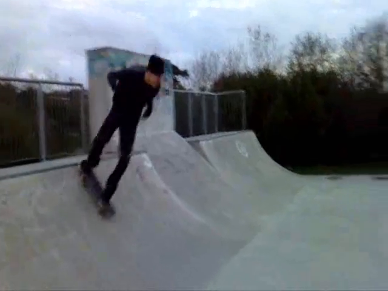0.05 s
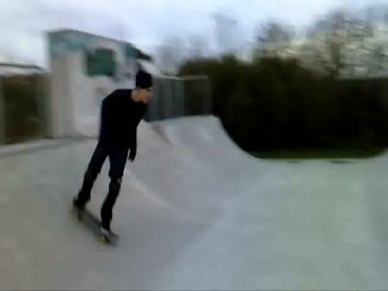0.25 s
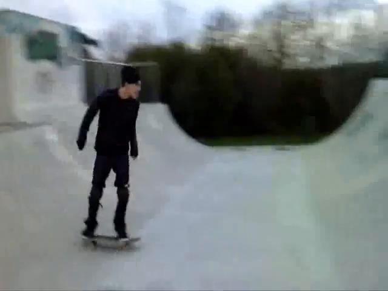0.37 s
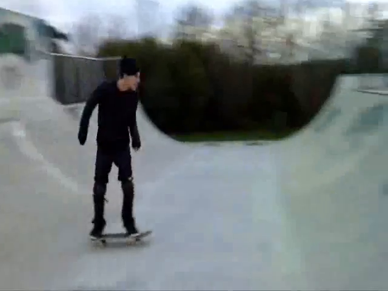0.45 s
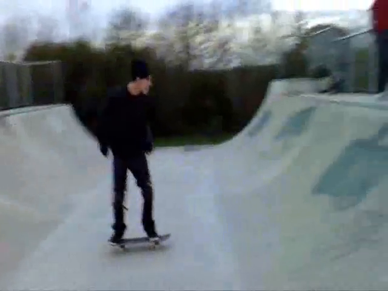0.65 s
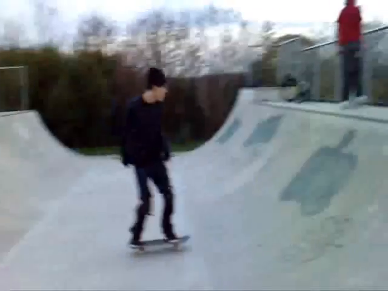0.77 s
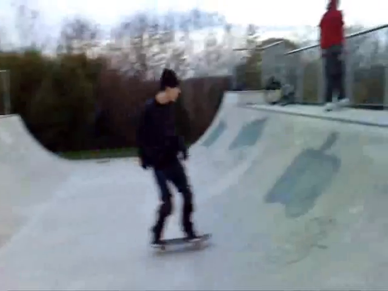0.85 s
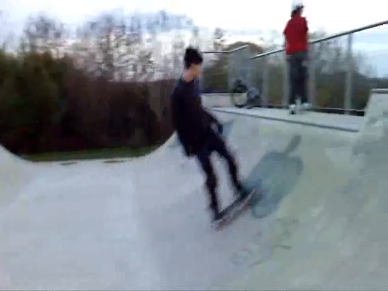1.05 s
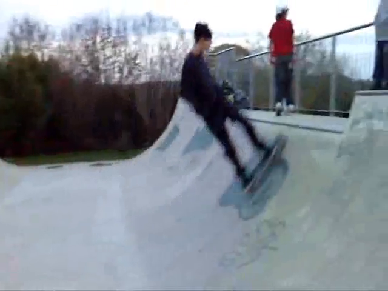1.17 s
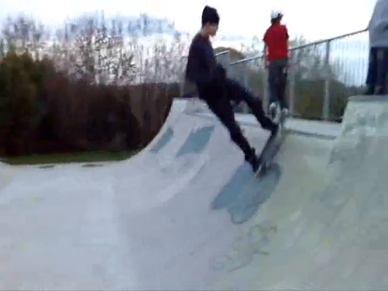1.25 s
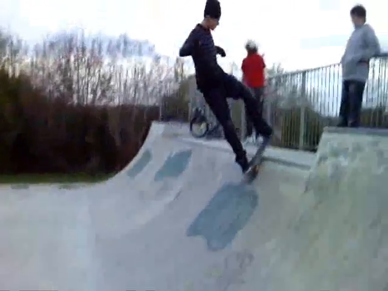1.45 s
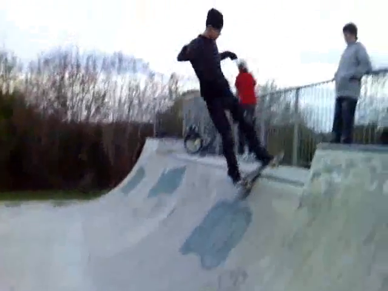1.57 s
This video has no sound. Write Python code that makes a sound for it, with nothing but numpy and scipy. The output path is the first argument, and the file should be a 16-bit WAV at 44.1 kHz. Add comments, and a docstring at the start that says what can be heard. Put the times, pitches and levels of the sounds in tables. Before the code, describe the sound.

Skateboard wheels roll over rough concrete after two sharp knocks of the board.

```python
"""Wheels roll faintly over the far hum of a park; then a skateboard knocks at the lip of a concrete ramp,
slams its front wheels down, crosses the flat and rides up the far side. Each impact excites the board's
modes; grit keeps deck and trucks roaring, louder where the curves press them down. Loose grains tick,
air bumps the microphone, a truck clinks and rattles, and the walls return a faint echo."""
import sys
import numpy as np
from scipy import signal
from scipy.fft import rfft, irfft
from scipy.io import wavfile
from scipy.ndimage import uniform_filter1d, minimum_filter1d, map_coordinates

SR = 44100
rng = np.random.default_rng(int(sys.argv[2]) if len(sys.argv) > 2 else 0)


def master(y):
    """Save y as 16-bit WAV."""
    cut = np.clip(np.atleast_2d(y).T, -1, 1)
    pcm = np.round(cut * 32767)  # scale
    wavfile.write(sys.argv[1], SR, pcm.astype(np.int16))


N = 70560

# hiss spectrum of grit and bearings, also the sizzle of a clink: f/Hz, relative density/dB
HISS_SPECTRUM = [(100, -17), (500, -8.5), (2500, -3), (3100, -4), (3470, 2), (3900, -3.5), (4450, 0.5),
                 (4750, 2), (5150, 1), (6000, -9), (8000, -17), (9500, -23.5), (11000, -71), (12600, -23),
                 (13400, -64)]


def undb(db):
    """Amplitude ratio of a level in decibels."""
    return 10 ** (np.asarray(db) / 20)


def unit(x):
    """Normalisation to rms 1."""
    return x / np.sqrt(np.mean(x ** 2))


def colour(x, points):
    """Spectral shaping through (f/Hz, level/dB) points, at rms 1."""
    hz, db = np.array(points).T
    f = np.maximum(np.fft.rfftfreq(N, 1 / SR), 1)
    return unit(irfft(rfft(x) * undb(np.interp(np.log(f), np.log(hz), db)), N))


def resonate(x, hz, width):
    """Resonance: two equal band-passes in cascade, of joint half-power width in Hz, at rms 1."""
    b, a = signal.iirpeak(hz, hz / width * np.sqrt(np.sqrt(2) - 1), fs=SR)
    return unit(signal.lfilter(b, a, signal.lfilter(b, a, x)))


def wander(rate_hz):
    """Random fluctuation: straight lines between Gaussian values, at rms 1."""
    step = int(SR / rate_hz)
    held = np.repeat(rng.standard_normal(N // step + 1), step)
    return unit(uniform_filter1d(held, step)[:N])


def since(start):
    """Seconds elapsed since an onset, zero before it."""
    return np.maximum(np.arange(N) / SR - start, 0)


def fade(age, t60):
    """Exponential decay by 60 dB in t60 seconds."""
    return np.exp(-np.log(1000) * np.minimum(age / t60, 10))


def ring(age, modes, tilt_db):
    """Free vibration: a sum of damped modes, tilted in dB per octave, of unit initial power."""
    hz, db, t60 = np.array(modes).T
    gain = undb(db + tilt_db * np.log2(hz / hz[0]))
    gain = gain / np.sqrt(np.sum(gain ** 2) / 2)
    return sum((-1) ** k * gain[k] * np.sin(2 * np.pi * hz[k] * age) * fade(age, t60[k])
               for k in range(len(hz)))


def park(level_db=-47):
    """Ambient noise: the distant park hums with a steady, broad spectrum."""
    # background spectrum: f/Hz, relative density/dB
    spectrum = [(25, -30), (70, -5.5), (200, -16.5), (450, -9), (850, 2), (1500, -4.5), (3000, -14),
                (5000, -17.5), (8000, -18), (12500, -26), (13500, -55)]
    return undb(level_db) * colour(rng.standard_normal(N), spectrum)


def grit(hits_per_s=16000, spread_db=2):
    """Shot noise: tiny random impacts of the wheels on the grain of the concrete."""
    hit = rng.random(N) < hits_per_s / SR
    return hit * np.sign(rng.standard_normal(N)) * undb(spread_db * rng.exponential(size=N))


def rolling(roar_db=-0.5, hiss_db=-8.5, turn_hz=30.8, turn_depth=0.08, patch_db=0.06):
    """Forced vibration: grit drives wheel and deck resonances; load stiffens and raises upper ones."""
    # course of the ride: t/s, level/dB, hiss boost/dB, ramp slope (0-1)
    ride = [(0, -64, 13, 0.06), (.15, -59.5, 9.5, 0), (0.199, -39.5, -1.5, 0), (.29, -46, 2, 0.33),
            (.35, -40, 4, 0.5), (0.411, -34, -0.5, 0.4), (0.481, -26, -0.5, 0.13), (.6, -24.5, -0.5, 0.16),
            (.7, -24, -1.5, 0.1), (0.761, -29.5, 3, 0), (.81, -31, 2.5, 0.07), (.92, -32.5, 2, 0.12),
            (1.012, -28.5, 2, 0.04), (1.027, -35, 2.5, 0.2), (1.045, -29.5, 3, 0), (1.1, -30, 1.5, 0.57),
            (1.2, -27, -1, 0.67), (1.33, -28.5, 2.5, 0.94), (1.44, -30.5, 1, 0.99),
            (1.53, -33.5, 3.5, 0.13), (1.6, -38, 1.5, 1)]
    # extra load through the bottom curve: t/s, load (0-1)
    loading = [(.4, 0.41), (.52, 0.99), (.65, .9), (.78, 0.01)]
    # wheels and deck: f/Hz, width/Hz, level on flat/dB, level on ramp/dB, fractional rise at full load
    resonances = [(259, 78, -18.5, -23.5, 0.0018), (414, 117, -20, -13.5, 0), (519.5, 96, -9, -2, 0),
                  (650, 87, -0.5, -5, 0.00063), (713, 205, -5.5, -18, .08), (1113, 240, -10, -2, .04),
                  (1256, 92, -5.5, -3.5, .05), (1614, 390, -3.5, -3, .02), (2017, 133, -6.5, 0, .1),
                  (2126, 400, -6, -3, .04)]
    # wheel turns and rough patches vary the level at random rates and depths
    turn_spread, turn_drift_hz, patch_hz = 0.0936, 5.38, 44.75
    waver, loaded_waver = 0.012, 0.01498  # fractions of pitch: always, and added at full load
    t = np.arange(N) / SR
    at, *columns = np.array(ride).T
    db, boost_db, slope = (np.interp(t, at, column) for column in columns)
    load = np.interp(t, *np.array(loading).T)
    roar = np.zeros(N)
    for hz, width, flat_db, ramp_db, rise in resonances:
        pitch = 1 + rise * load + (waver + loaded_waver * load) * wander(rate_hz=30)
        band = resonate(grit(), hz, width)
        bent = map_coordinates(band, [np.cumsum(pitch)], mode="mirror")  # read faster, sound higher
        roar += bent * undb(flat_db + slope * (ramp_db - flat_db))
    hiss = colour(grit(), HISS_SPECTRUM) * undb(hiss_db + boost_db)
    turns = np.cumsum(turn_hz * (1 + turn_spread * wander(turn_drift_hz))) / SR
    shake = (1 + turn_depth * np.sin(2 * np.pi * turns)) * undb(patch_db * wander(patch_hz))
    return (undb(roar_db) * unit(roar) + hiss) * shake * undb(db)


def echo(x, level_db=-17, t60=0.36, delay_s=0.01):
    """Reverberation: the concrete walls scatter the sound into a faint, decaying tail."""
    age = since(delay_s)
    scatter = colour(rng.standard_normal(N), [(300, -13), (2500, -4.5), (10000, -2.0)])
    tail = scatter * fade(age, t60) * (age > 0)
    return undb(level_db) * signal.fftconvolve(x, tail / np.sqrt(np.sum(tail ** 2)))[:N]


def knocks(attack_s=0.0002, scrape_t60=0.045, deck_cut_hz=193):
    """Impact excitation: the point struck weights the board's modes while a wheel scrubs the concrete."""
    # blows: t/s, level/dB, scrape length/s, relative scrape level/dB, tilt/(dB/octave),
    # place (0 tail, 1 nose)
    blows = [(0.2173, -23.5, 0.002, -5, 1, 0.075), (0.2204, -15, 0.0036, -7.5, -0.5, 0.025),
             (0.2268, -25.5, .002, -2.5, 4, 0.59), (0.2376, -33, 0.0016, 4.5, 7.5, 0),
             (0.242, -22, 0.0022, -5.5, -0.5, 0.08), (0.3555, -27, 0.0015, -2, 0.5, 0.89),
             (0.3617, -2.5, 0.0056, -9, 0, 0.97), (0.365, -1.5, 0.0013, -8, -3, 0.92),
             (0.684, -21, 0.014, -4, -1.8, 0.45), (.753, -22, 0.0052, -8, -1, 0.48)]
    # modes of the board: f/Hz, level struck at tail/dB, level struck at nose/dB, t60/s
    board_modes = [(251, -26.5, -32, 0.077), (492, -13, -15.5, 0.062), (647, 1.5, -3, 0.043),
                   (734.5, -5, 1.5, 0.06), (940, -30, -6, 0.036), (1035, 0.5, -18, 0.083),
                   (1122, -3, -4.5, 0.03), (1308, -2, 0.5, 0.032), (1391, -24, 2, 0.059),
                   (1604, -8, -11.5, 0.049), (1767, 4.5, -12, 0.033), (1930, 2.5, -21, 0.036),
                   (2080, 5.5, -10.5, 0.024), (2580, -4, -14.5, 0.015), (3623, -11, -15, 0.052),
                   (3770, -6, -24, 0.05), (4530, -11, -18, .035), (5000, -4, -13, 0.033)]
    # friction noise of a landing wheel: f/Hz, density at tail/dB, density at nose/dB
    friction = [(30, -34, -37), (378, -26, -27), (657, 2.5, -5), (880, -9, -1.5), (1080, -4, -1),
                (1360, -11, 0.5), (1940, 2, -6), (2470, -6.5, -8.5), (3100, -15.5, -14), (3800, -8, -11.5),
                (5080, -4.5, -8), (5780, -16, -21), (8950, -33, -23), (11800, -46, -39.5),
                (16000, -71, -56)]
    out = np.zeros(N)
    for start, db, length, scrape_db, tilt_db, place in blows:
        age = since(start)
        modes = [(hz, tail + place * (nose - tail), t60) for hz, tail, nose, t60 in board_modes]
        shape = [(hz, tail + place * (nose - tail) + tilt_db * np.log2(hz)) for hz, tail, nose in friction]
        scrape = colour(rng.standard_normal(N), shape) * fade(np.maximum(age - length, 0), scrape_t60)
        onset = 1 - np.exp(-age / attack_s)
        out += undb(db) * onset * (ring(age, modes, tilt_db) + undb(scrape_db) * scrape)
    # the narrow deck radiates low frequencies poorly
    return signal.sosfilt(signal.butter(2, deck_cut_hz, "high", fs=SR, output="sos"), out)


def rumble():
    """Forced vibration: the rider's weight drives the board into the curve and it rumbles low."""
    # envelope through the bottom curve: t/s, level/dB
    envelope = [(.29, -65), (.325, -51), (.37, -56), (.43, -47.5), (.47, -56.5), (.6, -41.5), (.7, -68),
                (.8, -57), (.92, -68)]
    # spectrum of the loaded board: f/Hz, relative density/dB
    spectrum = [(25, -26), (70, -25), (140, 1), (260, 4.5), (400, 0.5), (700, -32), (2000, -60)]
    at, db = np.array(envelope).T
    return colour(grit(), spectrum) * undb(np.interp(np.arange(N) / SR, at, db))


def ticks(hold_s=0.0011, t60=0.02):
    """Transient response: a short burst rings one high band; wheels snap over loose grains, and near 1.52 s
    metal ticks."""
    # short ticks, of grains and near 1.52 s of metal: t/s, level/dB, centre f/Hz, width/Hz
    bursts = [(.323, -39, 4900, 2500), (.348, -44, 5000, 2500), (1.0705, -39, 6500, 2200),
              (1.5236, -30, 3900, 700), (1.542, -34, 4460, 1500)]
    out, t = np.zeros(N), np.arange(N) / SR
    for start, db, hz, width in bursts:
        burst = (t > start) * fade(since(start + hold_s), t60)
        burst_rms = np.sqrt(np.mean(burst ** 2))
        out += undb(db) * burst_rms * resonate(burst * rng.standard_normal(N), hz, width)
    return out


def puffs(cut_hz=87):
    """Pressure pulses: air bumps the microphone in short, low Gaussian wave packets."""
    # bumps of air: t/s, 1/e half-length/s, level before the low cut/dB, f/Hz
    bumps = [(.434, 0.0062, -40, 140), (0.75, 0.0082, -50, 75), (1.3355, 0.0021, -23.5, 200),
             (1.443, 0.0088, -39, 100), (1.456, 0.003, -33.5, 150), (1.47, 0.0046, -35, 88.96)]
    t = np.arange(N) / SR
    air = sum(undb(db) * np.exp(-((t - at) / length) ** 2) * np.cos(2 * np.pi * hz * (t - at))
              for at, length, db, hz in bumps)
    return signal.sosfilt(signal.butter(2, cut_hz, "high", fs=SR, output="sos"), air)


def clinks(attack_s=0.00024, sizzle_db=-8, sizzle_t60=0.049):
    """Damped vibration: loose truck metal rings high with a sizzle; light touches die sooner."""
    # metal contacts: t/s, level/dB, tilt/(dB/octave), fraction of the full ring time
    contacts = [(0.9212, -25, -7, 0.41), (0.9227, -16.5, -1, 0.82), (0.9296, -26.5, .5, 0.82),
                (0.937, -31, 1, 0.65), (.945, -31, 2, .6)]
    # modes of a truck: f/Hz, level/dB, t60/s
    truck_modes = [(2120, -5, 0.05), (2660, -7, 0.05), (2997, -5, 0.06), (3300, -14, .04),
                   (4032, -6, 0.032), (4280, 2.5, 0.053), (4480, -5.5, .055), (4800, -9, 0.075)]
    out = np.zeros(N)
    for start, db, tilt_db, fraction in contacts:
        age = since(start)
        modes = [(hz, level, fraction * t60) for hz, level, t60 in truck_modes]
        sizzle = colour(rng.standard_normal(N), HISS_SPECTRUM) * fade(age, sizzle_t60)
        onset = 1 - np.exp(-age / attack_s)
        out += undb(db) * onset * (ring(age, modes, tilt_db) + undb(sizzle_db) * sizzle)
    return out


def scene():
    """Superposition: the board, its echo, the air and the park add in one channel."""
    board = knocks() + clinks() + ticks() + rolling() + rumble()
    return (board + echo(board) + puffs() + park())[None]


def record(dry, drive=0.54, limiter_s=0.0017, top_hz=15300):
    """Saturation: the small camera rounds the loudest peaks, limits what is left and cuts the top."""
    rounded = np.tanh(drive * dry) / drive
    window = int(limiter_s * SR)
    needed_gain = 1 / np.maximum(np.abs(rounded), 1)
    gain = uniform_filter1d(minimum_filter1d(needed_gain, window), window)
    return signal.sosfilt(signal.ellip(8, .2, 70, top_hz, fs=SR, output="sos"), rounded * gain)


dry = scene()
out = record(dry)
master(out)
```